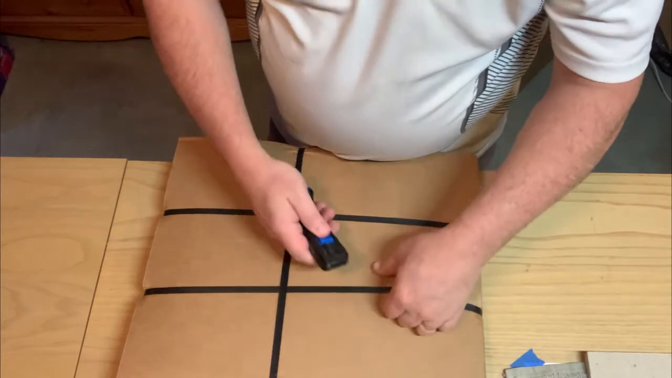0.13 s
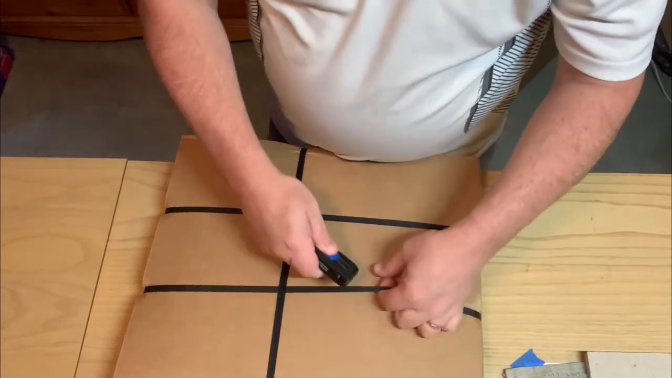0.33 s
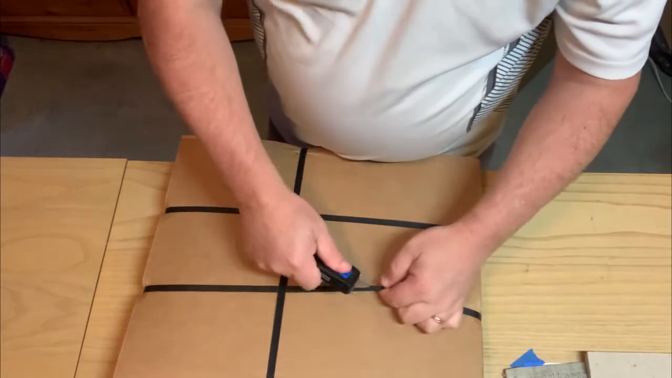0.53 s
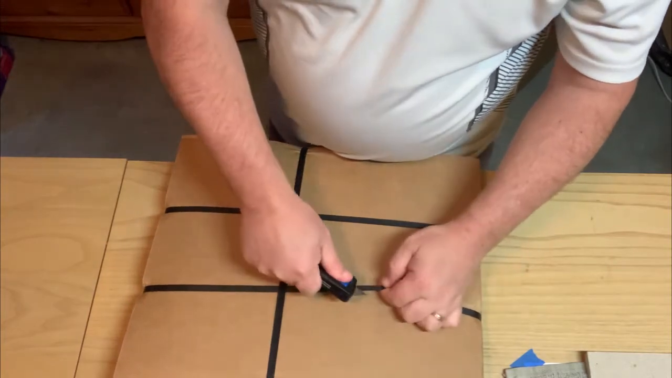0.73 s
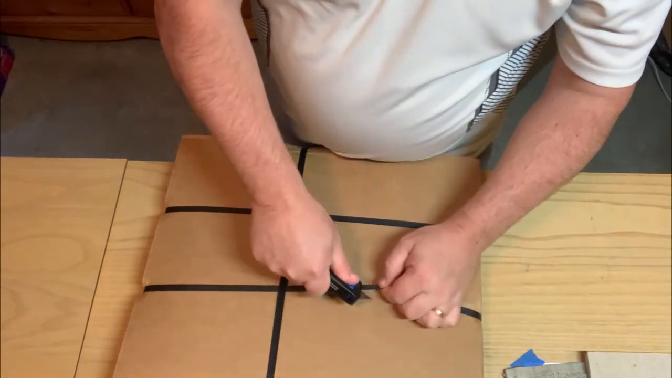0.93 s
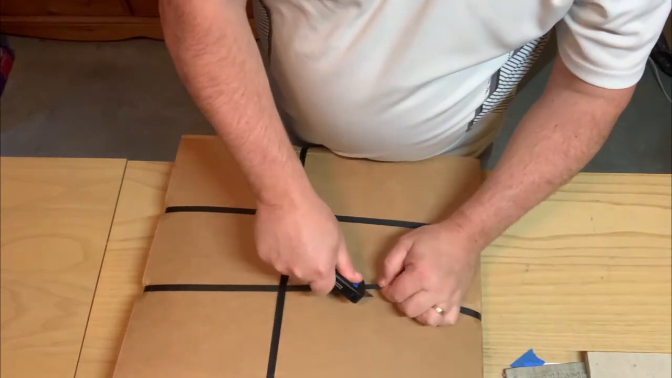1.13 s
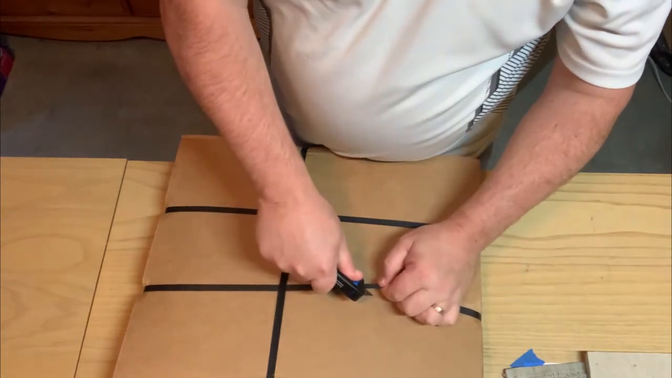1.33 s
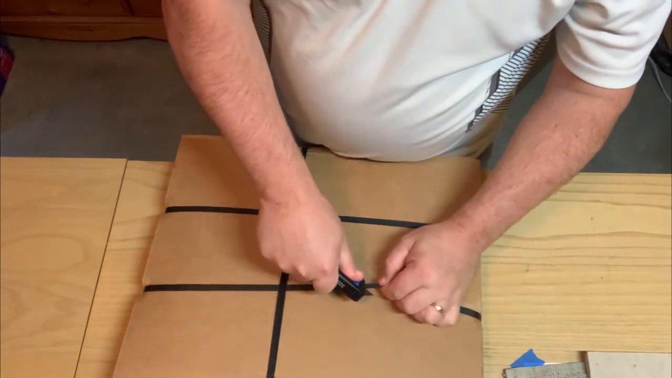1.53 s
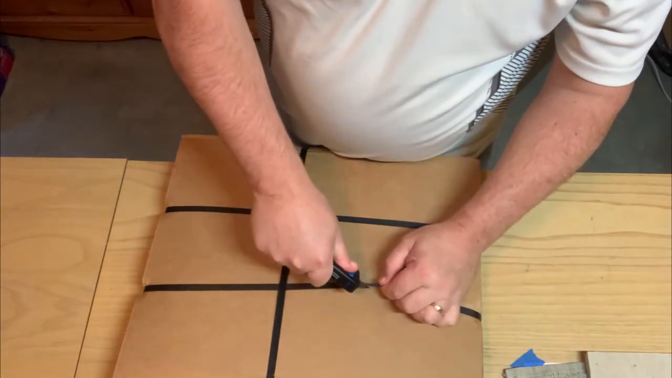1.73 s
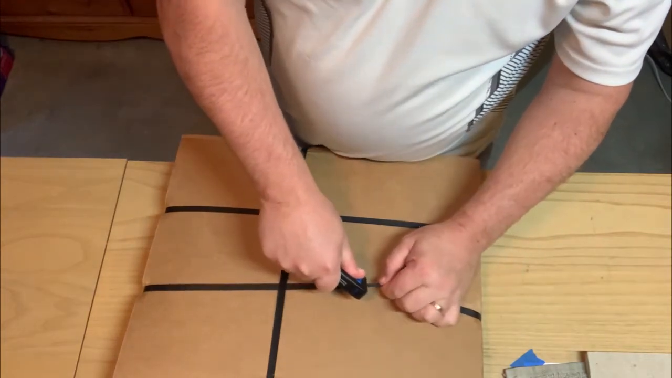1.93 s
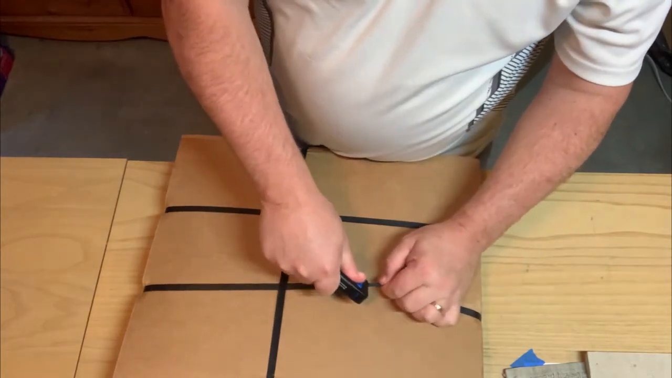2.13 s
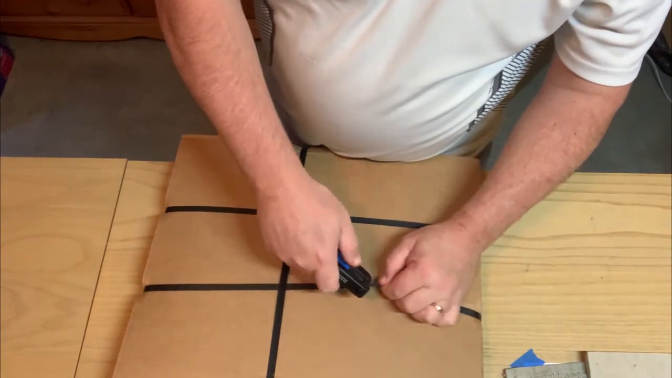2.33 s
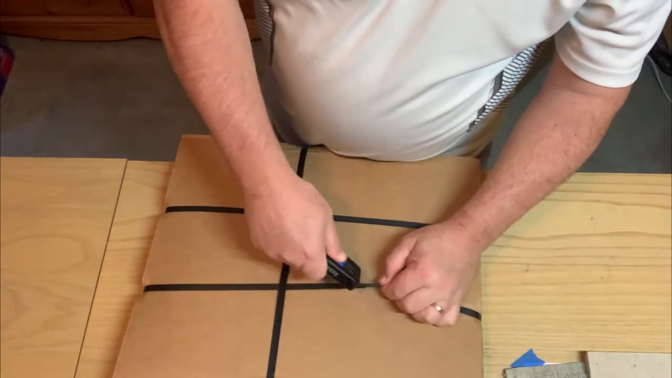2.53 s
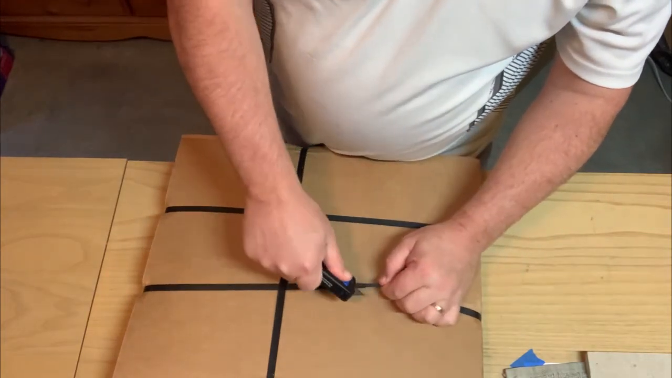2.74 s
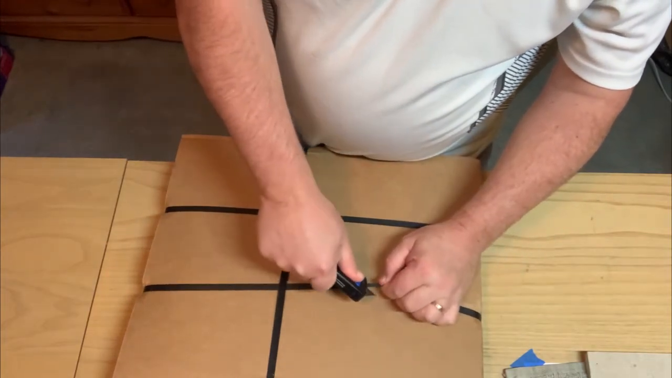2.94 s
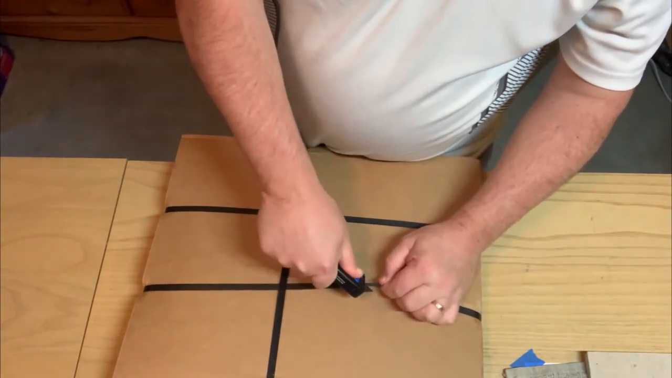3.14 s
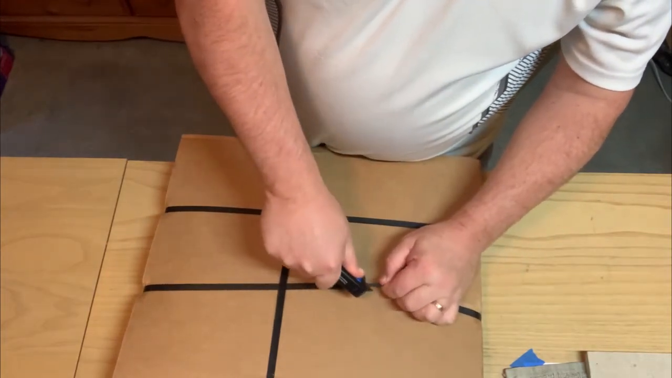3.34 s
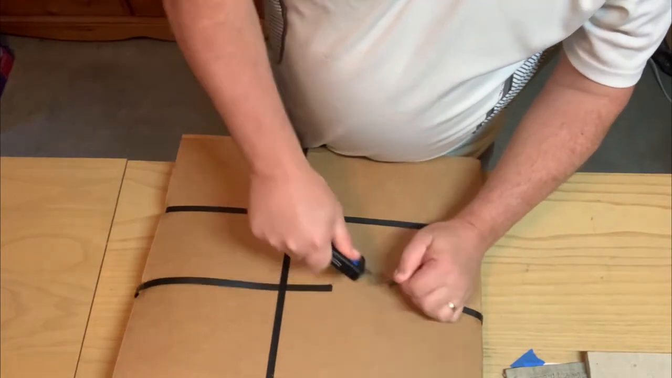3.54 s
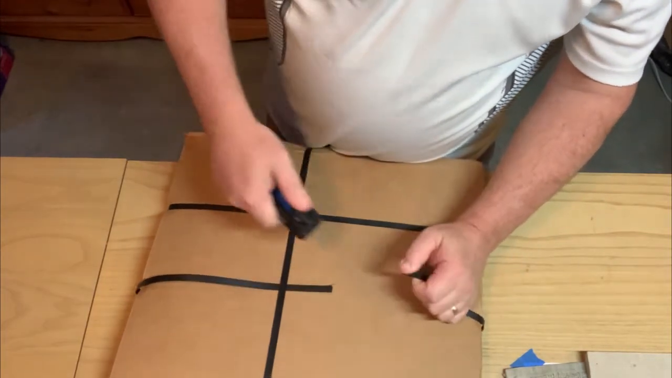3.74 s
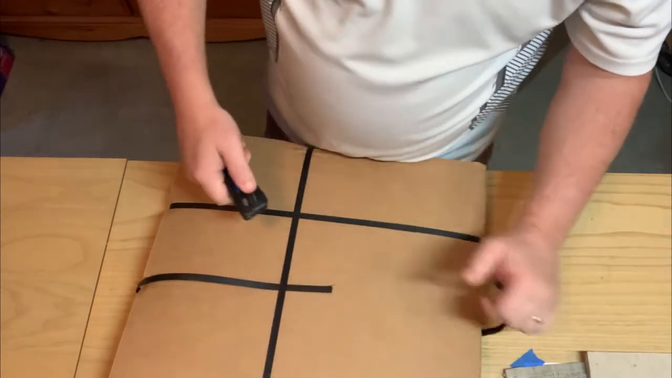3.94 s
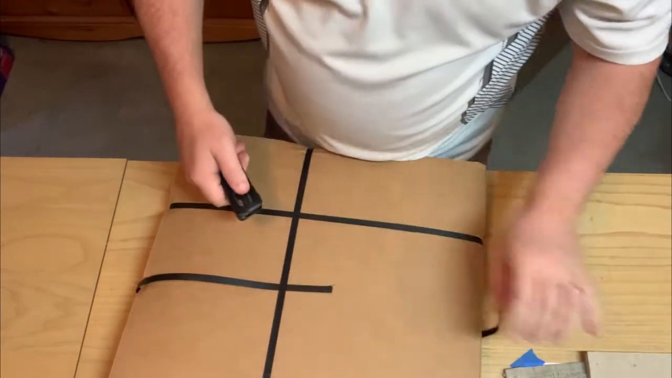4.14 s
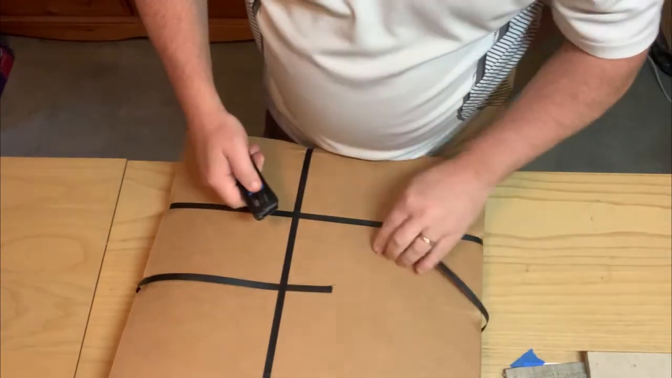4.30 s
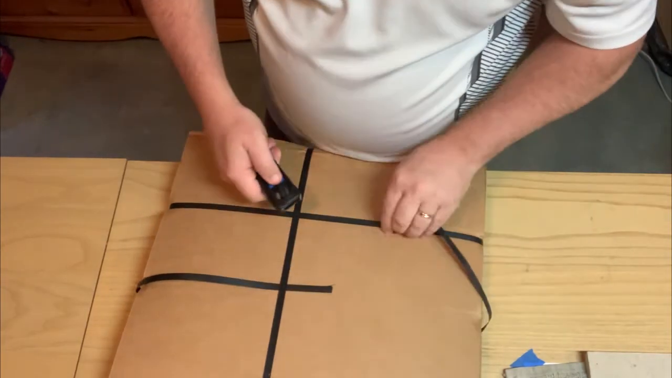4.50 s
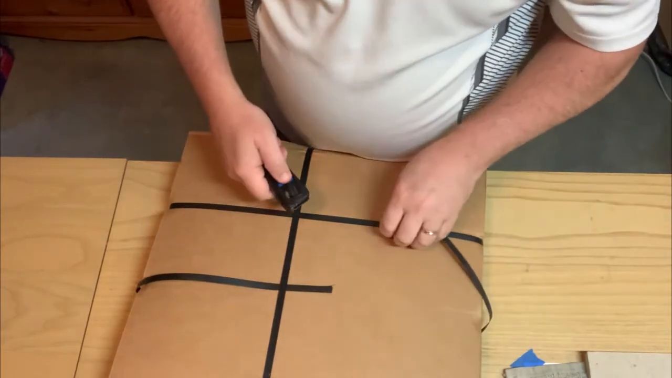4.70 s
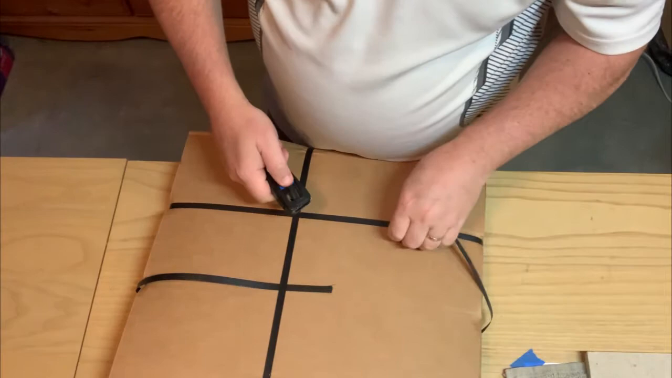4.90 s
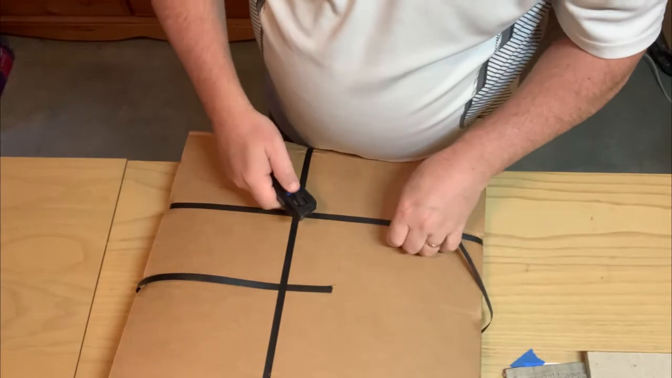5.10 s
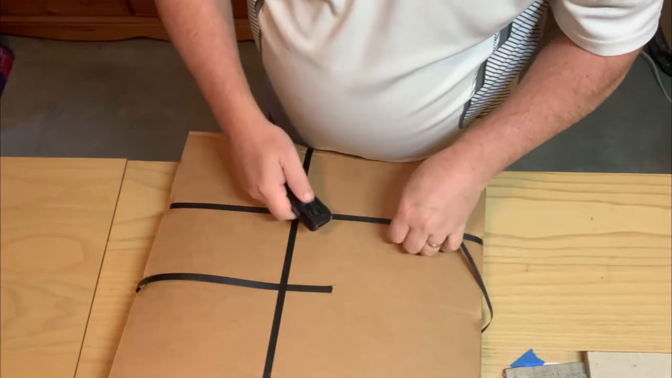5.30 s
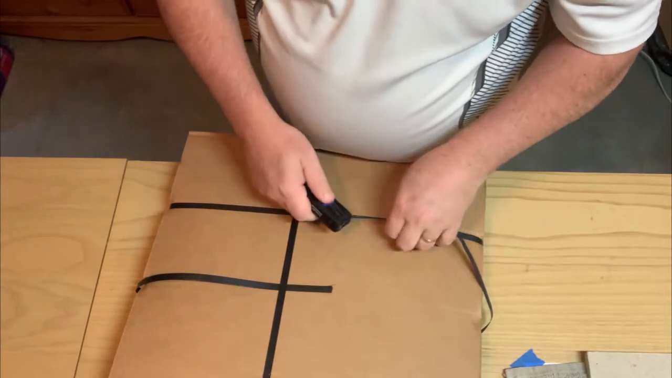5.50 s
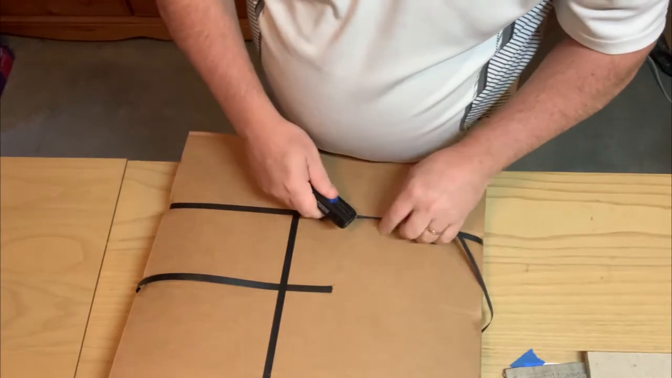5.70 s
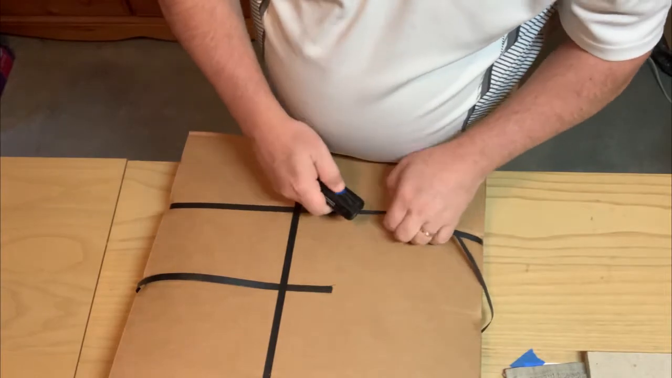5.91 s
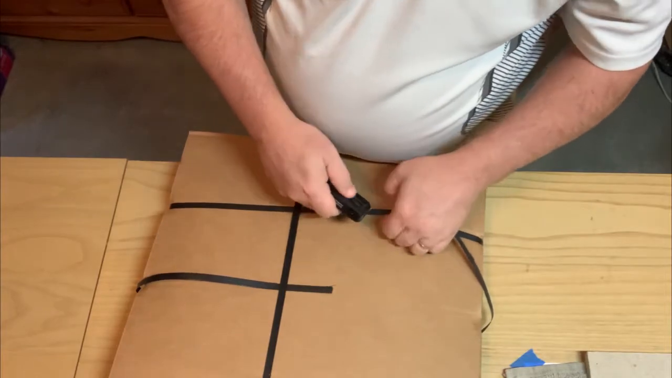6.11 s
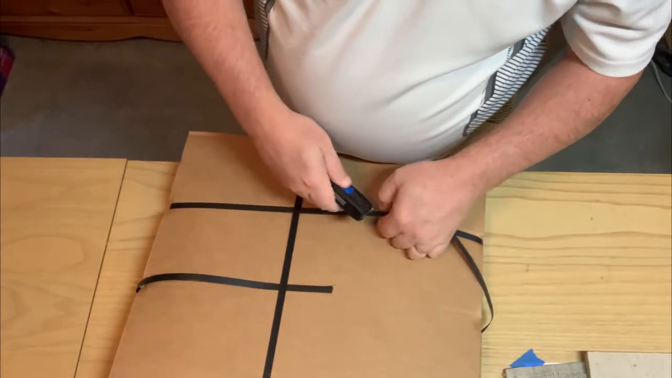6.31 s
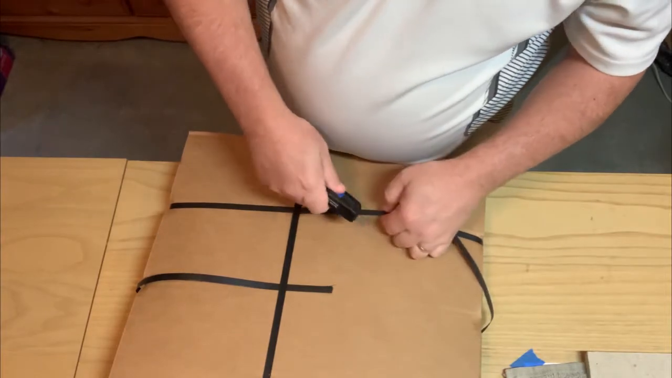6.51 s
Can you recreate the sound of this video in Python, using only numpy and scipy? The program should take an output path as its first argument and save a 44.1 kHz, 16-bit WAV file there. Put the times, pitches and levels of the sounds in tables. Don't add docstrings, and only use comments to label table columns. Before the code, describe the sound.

Close, from just above a cardboard box in a bare, lightly reverberant workshop. A distant motor hums low and unsteady throughout, with soft bench thuds. From 0 to 0.7 s fingers and knife tap and rub the card, the strap singing faintly; then near quiet until small scuffs around 1.2 and 1.5 s. At 1.65-1.86 s ticks build into a very sharp, bright plastic snap. Another hard, less fizzy crack comes at 2.39 s, light rubbing after, and a smaller snap at 3.05 s. At 3.37-3.42 s the strap tears in a rapid crackle and slaps the box with a short hollow ring. A loud double snap hits at 3.71 s. Sliding and a scuff at 4.1 s, strap hiss around 4.4-4.8 s, a medium crack at 5.42 s, a rough scrape at 5.64 s, small ticks at 5.85 s. A very faint whine joins from 5.9 s as light rubbing continues to 6.5 s.

```python
import sys
import numpy as np
from scipy import signal
from scipy.fft import rfft, irfft, next_fast_len
from scipy.io import wavfile
from scipy.ndimage import map_coordinates

SR = 44100
rng = np.random.default_rng(int(sys.argv[2]) if len(sys.argv) > 2 else 0)


def materialize(psi):
    bounded = np.clip(np.atleast_2d(psi).T, -1, 1)
    quanta = np.round(bounded * 32767).astype(np.int16)
    wavfile.write(sys.argv[1], SR, quanta)


def elevation(decibels):
    levels = np.asarray(decibels, float)
    return 10 ** (levels / 20)


N = 288980


def rms_one(x):
    return x / np.sqrt(np.mean(x ** 2) + 1e-20)


def in_time(rows):
    s, *columns = np.transpose(rows)
    return [np.interp(np.arange(N) / SR, s, column) for column in columns]


def at_hz(points, hz):
    table_hz, values = np.transpose(points)
    return np.interp(np.log(hz + 1), np.log(table_hz), values)


def colour(x, points):
    size = x.shape[-1]
    gain = elevation(at_hz(points, np.fft.rfftfreq(size, 1 / SR)))
    return rms_one(irfft(rfft(x) * gain, size))


def drift(rate):
    steps = rng.standard_normal(400)
    return map_coordinates(steps, [np.arange(N) / SR * rate * 2], order=3, mode="wrap")


def band(x, low_hz, high_hz):
    edges = [low_hz, min(high_hz, .45 * SR)]
    return signal.sosfilt(signal.butter(2, edges, "band", fs=SR, output="sos"), x)


def ring(x, hz, t60):
    r = elevation(-60 / (t60 * SR))
    w = 2 * np.pi * hz / SR
    return signal.lfilter([0, np.sin(w)], [1, -2 * r * np.cos(w), r * r], x + 1e-18)


def swells(rows, rise_db_per_s, fall_db_per_s):
    s, held, *layers_db = np.transpose(rows)[..., None]
    t = np.arange(0, N + 64, 64) / SR
    loss_db = rise_db_per_s * np.maximum(s - t, 0) + fall_db_per_s * np.maximum(t - s - held, 0)
    powers = [(elevation(db - loss_db) ** 2).sum(axis=0) for db in layers_db]
    return np.array([np.interp(np.arange(N) / SR, t, power) for power in powers])


def motor():
    # t/s, f/Hz, level/dB
    hum_curve = [(0.0, 104.5, -43), (0.13, 104.9, -45), (0.65, 104.4, -44), (0.99, 104, -47),
                 (1.3, 106.2, -50.5), (1.6, 104.5, -65.5), (1.77, 104.9, -49.5), (1.9, 104.3, -65.5),
                 (2.07, 106, -52), (2.37, 104.7, -46.5), (2.59, 105.4, -52), (3.25, 104, -52.5),
                 (3.56, 104.5, -50.5), (3.81, 104.7, -58), (4.0, 102.9, -48), (5.7, 105.7, -49),
                 (5.9, 105.6, -54.5), (6.55, 104.7, -59)]
    # multiple of the hum pitch, level/dB against the hum
    side_tones = [(1.298, -30.5), (2.022, -33.5), (3.01, -32.5)]
    # start t/s, f/Hz, level/dB
    start, whine_hz, whine_db = (5.9, 428, -74)
    wobble_db = 1.82
    hz, hum_db = in_time(hum_curve)
    turn = 2 * np.pi * np.cumsum(hz) / SR + .5 * drift(2.5)
    hum = np.sin(turn)
    for multiple, db in side_tones:
        hum = hum + elevation(db + 1.6 * drift(1.4)) * np.sin(multiple * turn)
    hum = np.sqrt(2) * elevation(hum_db - 1.0 + wobble_db * drift(16)) * hum
    t = np.arange(N) / SR
    fade_in = np.clip((t - start) / 0.039, 0, 1)
    return hum + elevation(whine_db) * fade_in * np.sin(2 * np.pi * whine_hz * t)


def background():
    # t/s, rumble level/dB, thud level/dB
    leans = [(0.18, -49.5, -58), (0.37, -60, -59.5), (0.98, -61.5, -76), (1.3, -61, -80),
             (1.76, -49.5, -52), (2.1, -59.5, -66), (2.55, -59.5, -58.5), (3.22, -47.5, -56),
             (3.56, -37.5, -48), (4.12, -54.5, -57), (4.402, -44, -58), (4.75, -54, -58.5),
             (4.948, -47, -54.5), (5.47, -50.5, -58.5), (5.88, -52.5, -59), (6.18, -51, -64.5),
             (6.43, -53.5, -62.5)]
    # f/Hz, level/dB
    rumble_colour = [(15, -20), (28, -16.5), (42, -11.5), (53, -2.5), (65, -8), (85, -10), (110, -33),
                     (400, -79)]
    thud_colour = [(60, -32.5), (125, 7.5), (180, -2.5), (250, -5), (320, -11.5), (450, -19), (800, -32.5),
                   (3000, -66.5)]
    air_colour = [(300, -9.5), (500, -0.5), (1200, -4.5), (2500, -11.5), (6000, -10), (8000, -7.5),
                  (10000, -9.5), (15000, -9.5)]
    still_db = [[-60.5], [-63]]
    lean_db_per_s, settle_db_per_s = 70.5, 66.5
    own = 0.4
    leaning = swells([(s, 0, *db) for s, *db in leans], lean_db_per_s, settle_db_per_s)
    rumble, thud = np.sqrt(leaning + elevation(still_db) ** 2)
    white = rng.standard_normal((2, N))
    near_pair = white[0] + own * white[1] * [[1], [-1]]
    low = rumble * elevation(1.5) * colour(near_pair, rumble_colour)
    low = low + thud * elevation(1.0) * colour(near_pair, thud_colour)
    leak = elevation(-86.5) * rms_one(ring(white[1], 6126, .006))
    air = elevation(-76) * colour(rng.standard_normal((2, N)), air_colour)
    return motor() + leak + low + air


def room(x):
    # f/Hz, time/s
    room_t60 = [(60, 0.36), (300, 0.32), (1300, 0.52), (3500, 0.61), (7000, 0.53), (10000, 0.44),
                (15000, 0.12)]
    # f/Hz, level/dB
    room_colour = [(60, -3.5), (300, 0.5), (600, 8.5), (1200, 6), (2500, 6), (4200, 4), (6500, 1.5),
                   (8300, 2.5), (10000, -4.5), (11500, 0.5), (15000, 5)]
    room_db, first_wall_ms = -5.5, 1.5
    t = np.arange(SR) / SR
    edges = 40 * 2 ** np.arange(0, 9.1, .5)
    white = rng.standard_normal((2, 2, SR))
    tail = 0
    for k, (low, high) in enumerate(zip(edges, edges[1:])):
        hz = np.sqrt(low * high)
        t60 = at_hz(room_t60, hz)
        tail = tail + elevation(at_hz(room_colour, hz) - 60 * t / t60) * band(white[k % 2], low, high)
    tail = tail * np.clip((t * 1e3 - first_wall_ms) / 0.43, 0, 1)
    return elevation(room_db) * signal.fftconvolve(x[None], tail / np.sqrt(SR * 0.035), axes=1)[:, :N]


def strap_tones(t60=0.025):
    # from t/s, to t/s, f/Hz, level/dB
    tones = [
        (-.1, 0.32, 1434, -65.5),
        (-.1, 0.244, 3570, -63.5),
        (0.37, 0.642, 1880, -65.5),
        (0.394, 0.685, 4030, -74),
        (0.676, 0.838, 2230, -74.5),
        (3.682, 3.991, 1350, -60.5),
        (3.945, 4.247, 1633, -65),
    ]
    t = np.arange(N) / SR
    noise = rng.standard_normal(N)
    total = 0
    for start, end, hz, db in tones:
        swell = np.sin(np.pi * np.clip((t - start) / (end - start), 0, 1))
        total = total + elevation(db) * swell * rms_one(ring(noise, hz, t60))
    return total


def slide(grain_db=4.0, hiss_grain_db=3.5, patchy_db=4.0):
    # full from t/s, held time/s, strap hiss level/dB, card scrape level/dB
    strokes = [(0.08, 0.11, -50.5, -59), (0.21, 0.09, -62, -59.5), (0.41, 0.14, -59.5, -57),
               (0.78, 0.034, -81, -74), (1.648, 0.014, -69, -68), (1.83, 0.21, -62.5, -50.5),
               (2.13, 0.029, -70, -58), (2.36, 0.19, -55, -52), (2.97, 0.031, -76, -59.5),
               (3.4, .57, -60, -50), (4.4, 0.069, -46.5, -60.5), (4.5, 0.045, -52.5, -51.5),
               (4.6, 0.087, -93, -66.5), (4.8, 0.0578, -52, -54), (5.22, 0.0094, -80, -68),
               (5.3, 0.015, -59, -61.5), (5.4, 0.16, -60, -55.5), (5.67, 0.01, -47.5, -57.5),
               (5.775, 0.017, -48.5, -59), (5.91, 0.02, -48.5, -51.5), (6.14, 0.048, -56.5, -71),
               (6.25, 0.33, -74, -66)]
    # t/s, strap hiss level/dB, card scrape level/dB
    scuffs = [(0.0, -83, -43.5), (1.222, -94, -55), (1.548, -78.5, -55.5), (1.65, -64.5, -48),
              (1.75, -58.5, -53.5), (1.784, -55.5, -43), (2.63, -49, -46), (2.778, -87, -56),
              (3.058, -56, -45.5), (3.154, -58.5, -44.5), (3.299, -74, -50.5), (4.112, -50, -38.5),
              (4.366, -43, -75), (4.714, -49, -47), (4.948, -63, -50.5), (5.64, -60.5, -36),
              (5.85, -76, -50.5), (6.536, -70, -56.5)]
    # f/Hz, level/dB
    hiss_colour = [(2500, -16.5), (5000, -18), (7200, -5.5), (8000, -7.5), (9300, 3.5), (10500, -2),
                   (12000, -5), (14500, -10.5), (17000, -12)]
    scrape_colour = [(300, -14), (700, -12.5), (1000, -5), (1250, -0.5), (1550, -2.5), (1950, -1),
                     (2700, -8.5), (3600, -2), (4200, -1), (5200, -2.5), (6500, -13), (9000, -26)]
    power = swells(strokes, rise_db_per_s=260, fall_db_per_s=283)
    power = power + swells([(s, 0, *db) for s, *db in scuffs], rise_db_per_s=2001, fall_db_per_s=302.5)
    hiss_gain, scrape_gain = np.sqrt(power)
    uneven = np.minimum(rng.exponential(1, (2, N)), 5)
    grains = rng.standard_normal((2, N)) * elevation(np.array([[hiss_grain_db], [grain_db]]) * uneven)
    hiss = hiss_gain * elevation(1.0 + patchy_db * drift(9.1)) * colour(grains[0], hiss_colour)
    scrape = scrape_gain * elevation(-7 + patchy_db * drift(22)) * colour(grains[1], scrape_colour)
    return hiss + scrape


def slaps(dull_db=-14, uneven_db=8.5, blur=0.34, blur_db=10.5):
    # t/s, level/dB, softness 0-1 (dulls the high panels)
    blows = [(3.4175, -10, 0.29), (3.446, -32, 0.18), (3.461, -34, 0.3), (3.505, -41, 0.3),
             (3.554, -34.5, 0.42), (3.604, -32.5, 0.2), (3.656, -40, 0.2), (4.113, -45.5, 0.62),
             (4.784, -45.5, 0.35), (5.862, -50, 0.21), (5.94, -54, 0.53), (3.154, -47, 0.23),
             (5.416, -50.5, 0), (4.56, -54, 0.3), (4.62, -56.5, .4)]
    # f/Hz, level/dB, time to fall by 60 dB/s
    panels = [(49.6, -20.5, 0.21), (104.5, -23.5, .25), (147.9, -10, 0.21), (223.5, -2.5, 0.07),
              (319, 5, 0.042), (447.4, -2.5, 0.06), (533, -3, 0.06), (651, -2, 0.051), (720.3, -1, 0.034),
              (790, 3.5, 0.064), (962, -2, 0.051), (1130, 3.5, 0.04), (1300, 14.5, 0.021),
              (1500, -5.5, 0.0078), (2050, 14, 0.011)]
    spread_ms = 11.81
    out = np.zeros((2, N + SR))
    t = np.arange(SR // 3) / SR
    for (s, blow_db, soft), spot in zip(blows, rng.standard_normal((len(blows), len(panels)))):
        i = round(s * SR)
        spot = spot * (s > blows[0][0])
        for (hz, level_db, t60), chance in zip(panels, spot):
            late = spread_ms * 0.000953 * (300 / hz) ** 0.737
            since = np.maximum(t - 0.71 * late, 0)
            fade = np.array([elevation(-60 * since / t60), elevation(blur_db - 60 * since / (blur * t60))])
            dulling_db = soft * dull_db * np.log2(hz / 300)
            gain = elevation(blow_db + level_db + dulling_db + uneven_db * chance * np.sqrt(abs(soft)))
            wave = np.sin(2 * np.pi * hz * (1 + 0.02 * soft * chance) * since)
            swell = 1 - np.exp(-since / (0.56 * late))
            out[:, i:i + len(t)] += gain * swell * fade * wave
    return band(out[:, :N], 66, 9000)


def voices(push, hz, shell_hz, shell_ring, knock_cycles):
    shell = push + shell_ring * band(push, .83 * shell_hz, 1.2 * shell_hz)
    strap = push + .9 * band(push, 8700, 10800)
    knock = ring(band(band(push, 830, 4100), 1100, 6000), hz, knock_cycles / hz)
    return np.array([band(shell, 3600, 9300), band(strap, 6500, 14500), knock])


def contacts(rows, faint_db=-27, trail_ms=47.0, swell_ms=2.0):
    # t/s, f/Hz, strength of the ring
    grip = [
        (1.86, 4500, 1.1),
        (2.39, 3800, 0.7),
        (3.05, 4600, 0.55),
        (3.38, 5500, 0.54),
        (3.42, 5000, .3),
        (3.72, 4626, 1.2),
        (5.42, 4100, 1.08),
    ]
    grip_s, *grip_columns = np.transpose(grip)
    span, lead_in = 2048, 512
    out = np.zeros((2, N + span))
    t = (np.arange(span) - lead_in) / SR
    for (s, *levels_db, hz, ms), noise in zip(rows, rng.standard_normal((len(rows), span))):
        before, after = np.minimum(t, 0), np.maximum(t, 0)
        u = after / (max(ms, .3) * 0.00097)
        splinter = (u * np.exp(1 - u)) ** 1.3
        shape = splinter + elevation(faint_db) * np.exp(before * 1e3 / swell_ms - after * 1e3 / trail_ms)
        shell = [np.interp(s, grip_s, column) for column in grip_columns]
        near = voices(shape * noise * np.abs(noise), hz, *shell, 10.0)
        near = near * (elevation(np.array(levels_db) + 4.0) / np.abs(near).max(axis=1))[:, None]
        click = 1. * (np.arange(span) == shape.argmax())
        around = voices(click, hz, *shell, 6.0)
        around = around * np.sqrt((near ** 2).sum(axis=1) / (around ** 2).sum(axis=1))[:, None]
        around[2] *= elevation(-3.0)
        i = round(s * SR) - lead_in
        out[:, i:i + span] += near.sum(axis=0), around.sum(axis=0)
    return out[:, :N]


def touches():
    # t/s, crack peak/dB, fizz level/dB, knock level/dB, knock f/Hz
    slips = [(1.6436, -38, -36.5, -52, 1300), (1.688, -36, -35, -56.5, 1320),
             (1.728, -37, -28.5, -48, 1900), (1.7503, -41.5, -39, -37.5, 1590),
             (1.7821, -28.5, -19, -40.5, 1110), (1.8463, -20, -18, -31, 2020),
             (1.8569, -8.5, -2.5, -26, 1270), (2.3892, -9, -26, -30.5, 1210),
             (2.5626, -55.5, -36.5, -46, 2045), (2.6345, -39.5, -29.5, -47.5, 1290),
             (3.046, -24, -20, -30.5, 2280), (3.1535, -31.5, -33.5, -35, 1590),
             (3.1662, -39.5, -50, -51, 1120), (3.3018, -37.5, -46, -43.5, 2100),
             (3.71, -14, -10, -35, 2210), (3.725, -7, -2.5, -26.5, 1310), (4.1059, -50, -30, -64, 1310),
             (4.7837, -50, -45, -45, 1710), (4.9445, -64, -33.5, -37.5, 1366),
             (5.4157, -19.5, -16.5, -31.5, 1620), (5.6412, -59, -24, -42, 1770),
             (5.7628, -42, -36, -45.5, 1355), (5.8475, -66.5, -29.5, -37, 1436),
             (5.8584, -30.5, -59, -42.5, 1120)]
    # t/s, knock level/dB, knock f/Hz, crack above the knock/dB
    taps = [(0.1523, -46, 1730, -1), (0.3534, -55, 1410, 1), (0.37, -60, 1900, 12),
            (0.3802, -49.5, 1900, 8.5), (0.416, -60, 2000, -18), (0.432, -64.5, 1210, -10),
            (0.435, -49.5, 1880, -15), (0.472, -49, 1850, -2), (0.511, -47.5, 1150, -19),
            (0.512, -53, 1957, -8), (0.544, -58, 1950, -19), (0.4546, -54, 1900, -23),
            (0.4984, -49, 1170, 6), (0.556, -46, 1900, 6.5), (0.6103, -57.5, 1220, 5),
            (0.6366, -56.5, 1130, 3), (0.709, -56, 2320, -14), (1.1074, -69, 1135, -21),
            (1.1454, -67, 1160, -20), (1.2213, -55, 1620, -29), (1.2606, -65, 1190, 1.5),
            (1.511, -67, 1314, -19), (1.5502, -58.5, 1900, -11.5), (1.655, -47.5, 1700, -5),
            (1.754, -45.5, 1700, -4), (1.79, -48.5, 2015, -1), (2.129, -52, 1393, -6),
            (2.222, -58, 1180, 8), (2.2644, -64, 1205, 19.5), (2.7095, -52.5, 1115, 7),
            (2.7703, -51.5, 1110, 1.5), (2.8882, -61, 1130, -3), (2.9444, -57, 1176, -9.5),
            (2.9644, -56, 1409, -6), (3.1254, -41.5, 1584, -15.5), (4.1135, -52.5, 1300, 14.5),
            (5.3005, -56, 1550, 8), (5.3244, -53.5, 1890, -16.5), (6.3155, -61.5, 1825, 7.5),
            (6.4374, -61, 954, 7), (6.5336, -60, 1920, 22.5)]
    # t/s, fizz level/dB
    flicks = [(1.652, -40), (1.657, -56), (1.731, -27.5), (1.736, -39.5), (1.741, -38), (1.754, -30),
              (1.758, -35), (1.794, -30), (1.8525, -23.5), (2.782, -48), (2.837, -51), (3.055, -39),
              (3.064, -39.5), (3.117, -38.5), (3.16, -44), (4.312, -49.5), (4.348, -41), (4.356, -39),
              (4.3714, -44.5), (4.7127, -41), (6.2743, -45), (6.47, -51)]
    tap_ms = 1.3
    rows = [(*row, 3.0 + 0.22 * row[1]) for row in slips]
    for s, db, hz, up_db in taps:
        rows.append((s, db + up_db, db + up_db - 15, db, hz, tap_ms))
    for s, db in flicks:
        rows.append((s, db - 16, db, db - 20, 1350, tap_ms))
    return sorted(rows)


def fibres():
    # t/s, crack peak/dB, fizz level/dB, knock level/dB
    tear = [
        (3.3655, -38, -33.5, -50.5),
        (3.3742, -18, -15, -45),
        (3.380, -23.5, -17, -29),
        (3.3848, -22, -7, -29.5),
        (3.390, -10, -11.5, -21),
        (3.3965, -25, -14, -28),
        (3.4020, -25.5, -21, -26.5),
        (3.4140, -24, -22.5, -28.5),
        (3.4180, -11.5, -7, -17.5),
        (3.4225, -9.5, -8, -23.5),
    ]
    taut_hz, slack_hz, fibre_ms = 1900, 1300, 1.6
    return [(*row, taut_hz, fibre_ms) for row in tear[:-1]] + [(*tear[-1], slack_hz, fibre_ms)]


def scene():
    rubbing = slide() + strap_tones()
    cutting = contacts(touches()) + contacts(fibres(), faint_db=-23, trail_ms=2.5)
    near, around = cutting + slaps() + rubbing * elevation([[0], [-2]])
    return near + room(around) + background()


def band_limit(x):
    return signal.sosfilt(signal.butter(12, 16990, fs=SR, output="sos"), x)


def record(dry):
    # f/Hz, angle/rad
    lead = [(60, 0.16), (800, 1.0), (1400, -.6), (3500, -1.8), (5500, -3.4), (6500, -5), (7300, -4),
            (7800, -3.6), (8300, -3.3), (9300, -3.1), (9800, -2.9), (10500, -2.4), (11500, -1.45),
            (12500, -.7), (13400, 0), (20000, 0)]
    # f/Hz, share 0-1
    width = [(100, 1), (6800, 1), (7900, 0.038), (9800, .02), (10500, 0.4), (12500, .45), (13400, .03)]
    # f/Hz, level/dB
    tilt = [(60, -2), (150, -4.5), (400, 0.3), (2000, 0), (4500, 3.5), (6500, 5.5), (15000, 0)]
    port_cut_hz = 15200
    size = next_fast_len(N + 4096)
    hz = np.fft.rfftfreq(size, 1 / SR)
    left, right = rfft(dry, size) / np.sqrt(1 + (hz / port_cut_hz) ** 56)
    sides = np.array([[1], [-1]])
    pair = (left + right) / 2 + sides * np.clip(at_hz(width, hz), 0, 1) * (left - right) / 2
    pair = pair * elevation(sides * at_hz(tilt, hz) / 2) * np.exp(.5j * sides * at_hz(lead, hz))
    mix = np.clip(irfft(pair, size)[:, :N], -1, 1)
    return band_limit(mix)


dry = scene()
out = record(dry)
materialize(out)
```